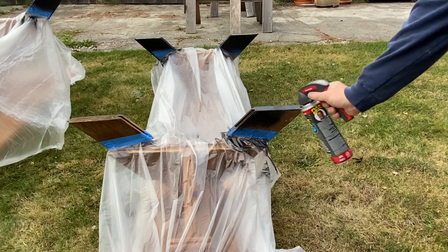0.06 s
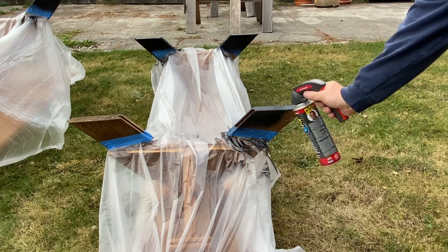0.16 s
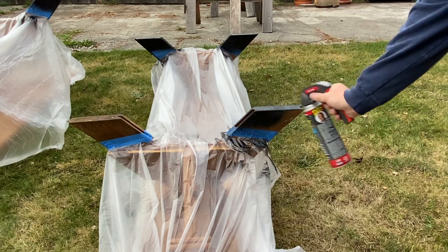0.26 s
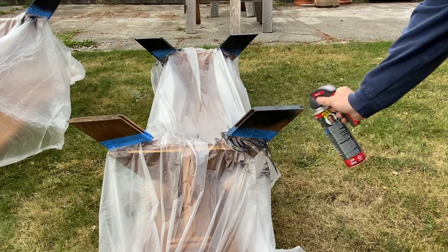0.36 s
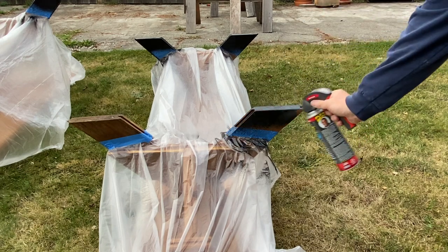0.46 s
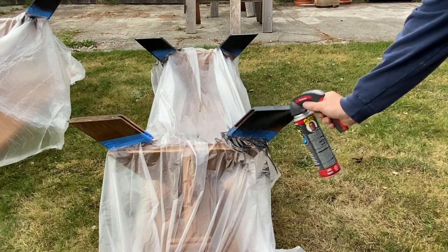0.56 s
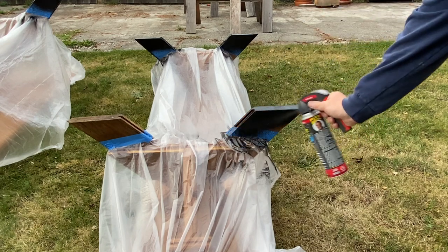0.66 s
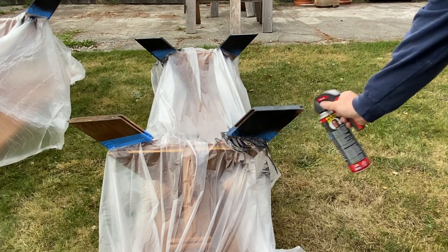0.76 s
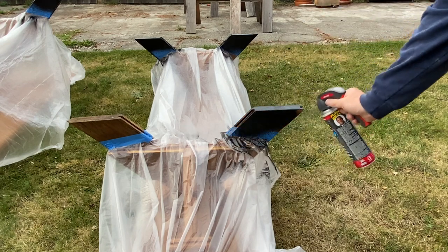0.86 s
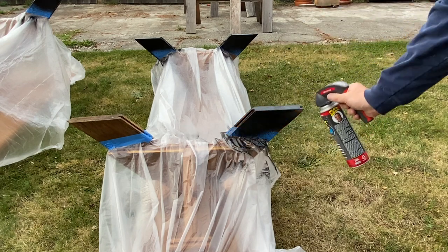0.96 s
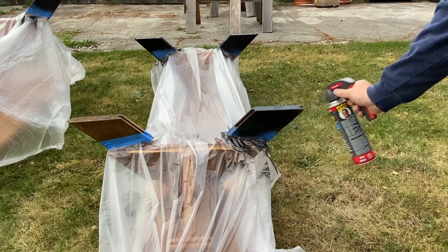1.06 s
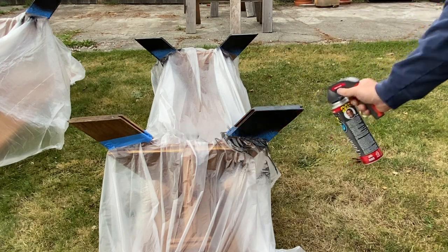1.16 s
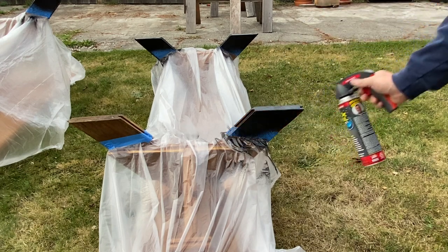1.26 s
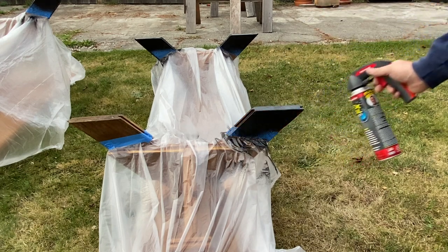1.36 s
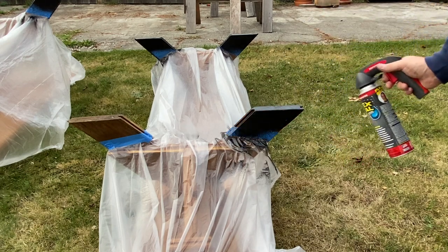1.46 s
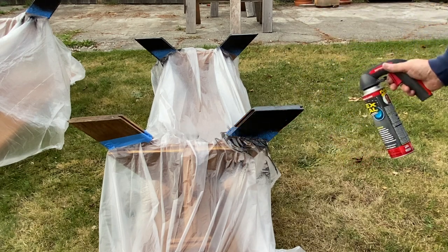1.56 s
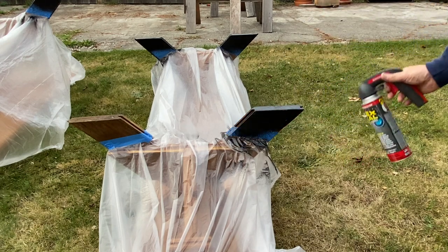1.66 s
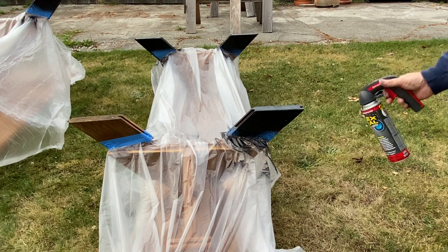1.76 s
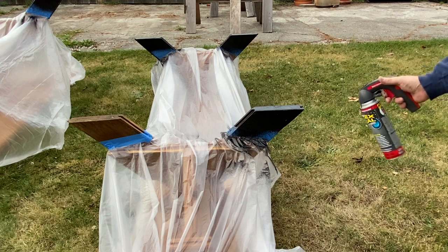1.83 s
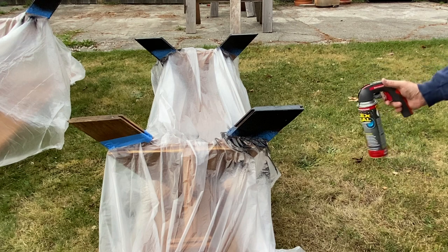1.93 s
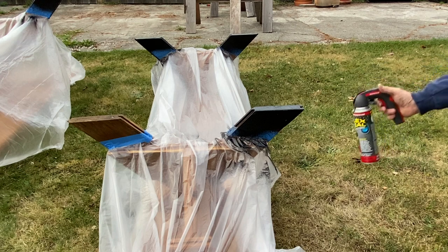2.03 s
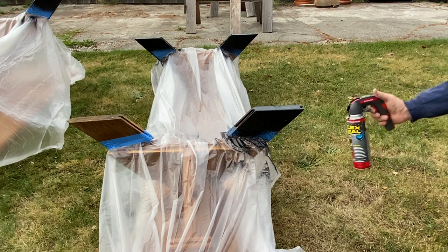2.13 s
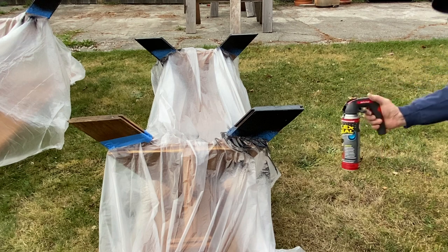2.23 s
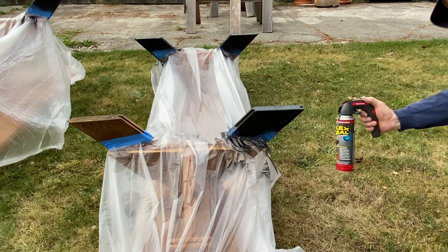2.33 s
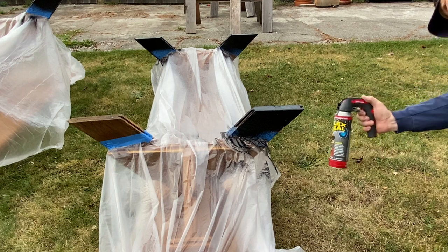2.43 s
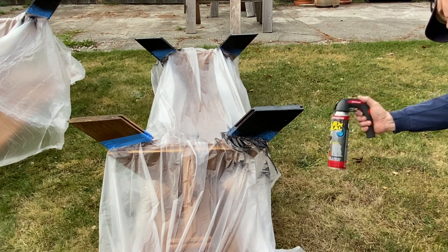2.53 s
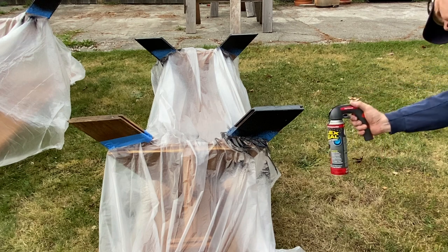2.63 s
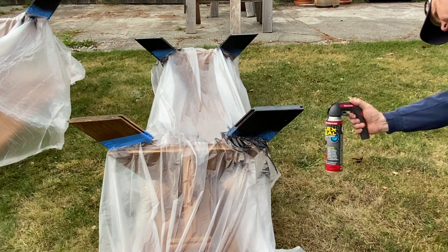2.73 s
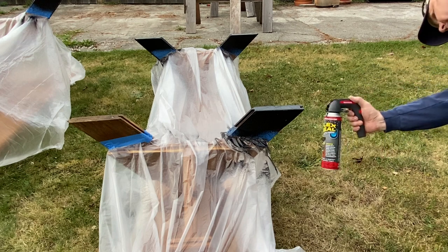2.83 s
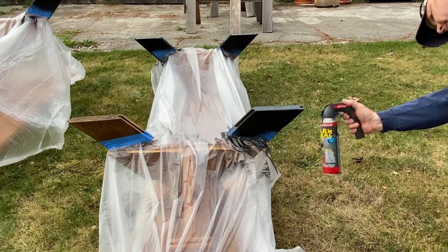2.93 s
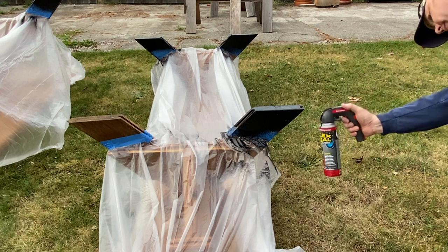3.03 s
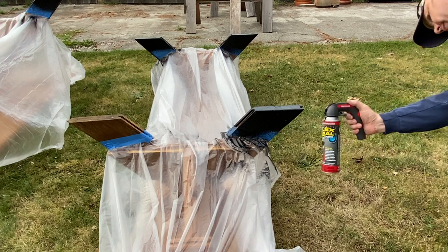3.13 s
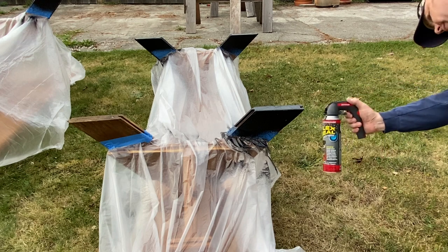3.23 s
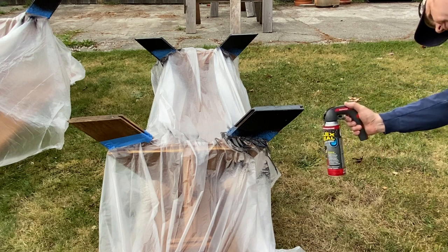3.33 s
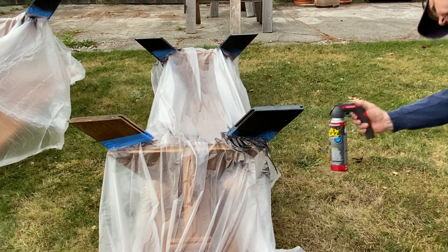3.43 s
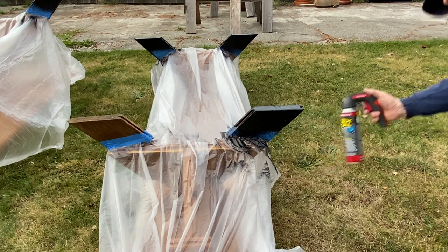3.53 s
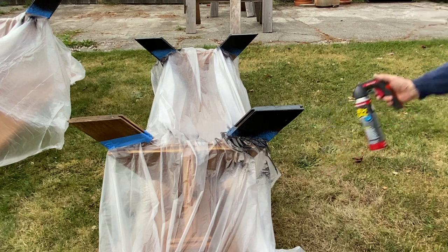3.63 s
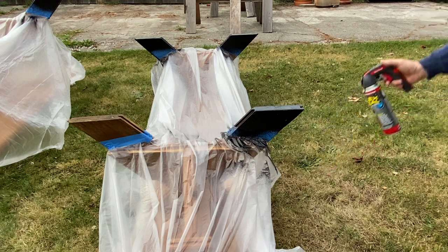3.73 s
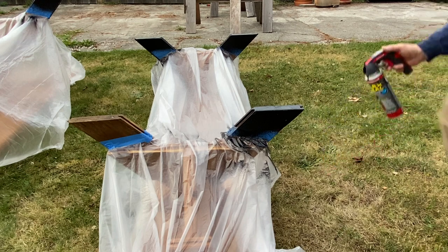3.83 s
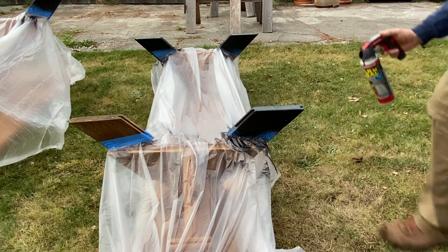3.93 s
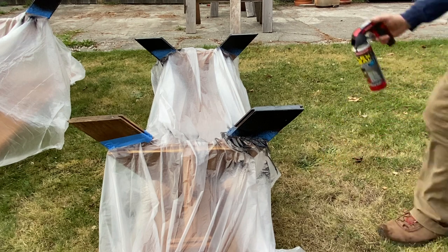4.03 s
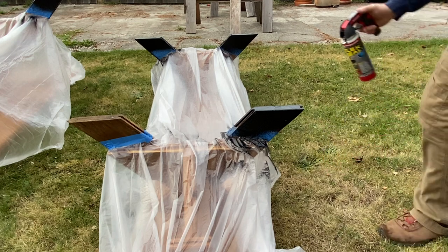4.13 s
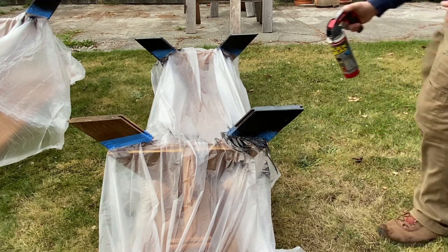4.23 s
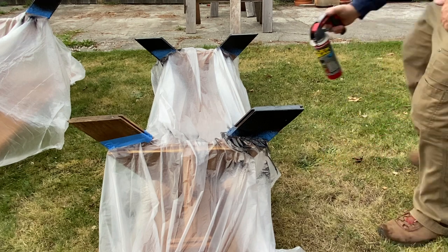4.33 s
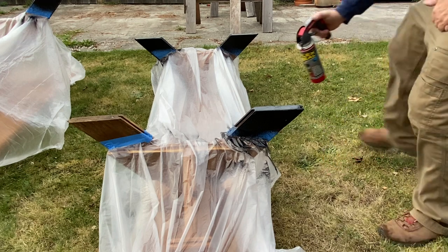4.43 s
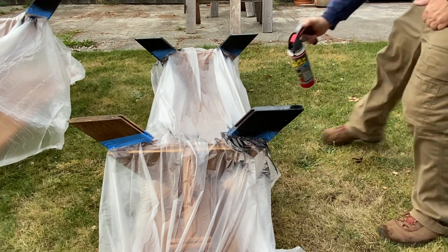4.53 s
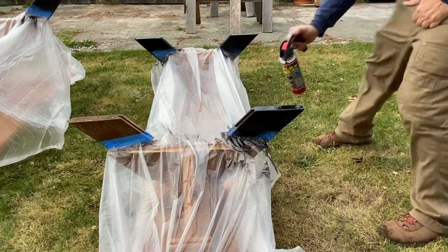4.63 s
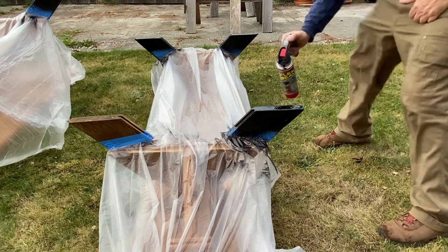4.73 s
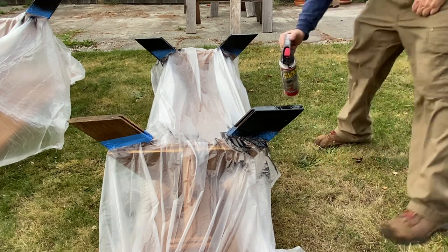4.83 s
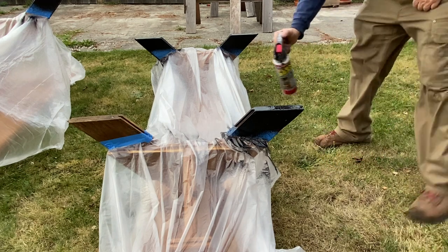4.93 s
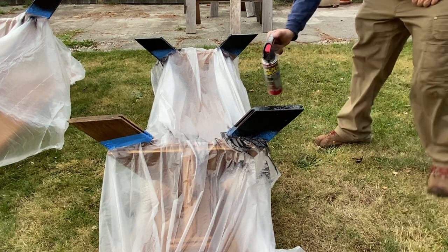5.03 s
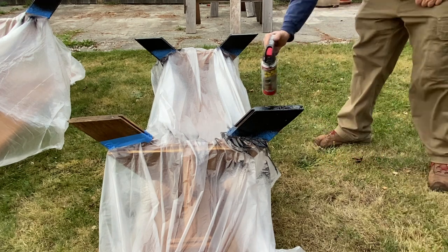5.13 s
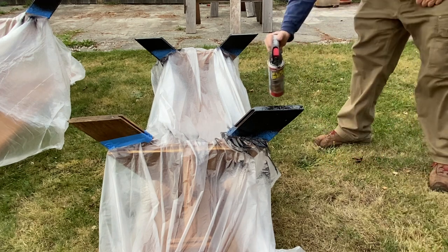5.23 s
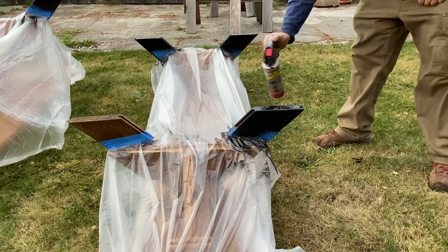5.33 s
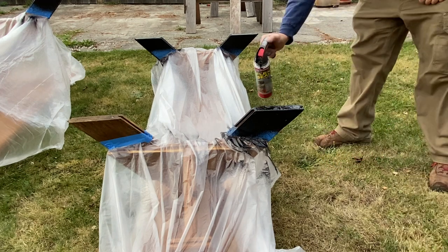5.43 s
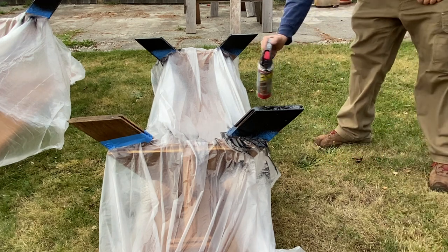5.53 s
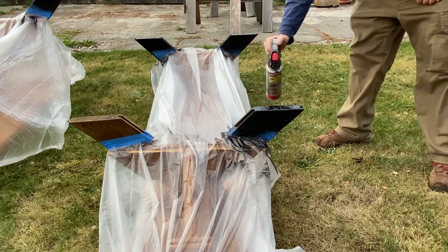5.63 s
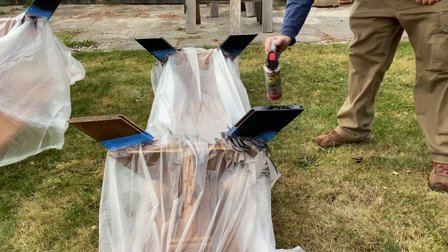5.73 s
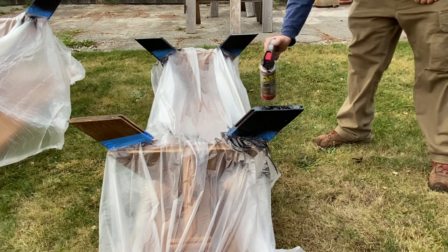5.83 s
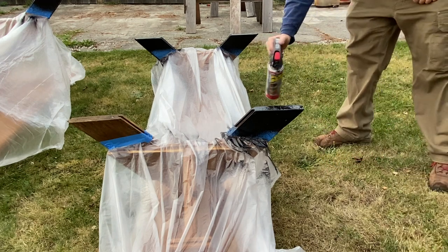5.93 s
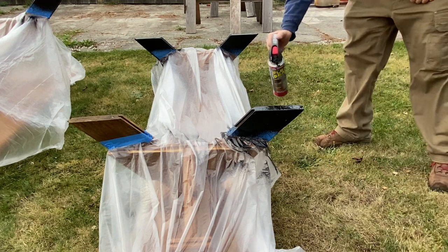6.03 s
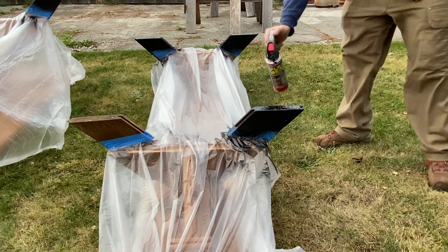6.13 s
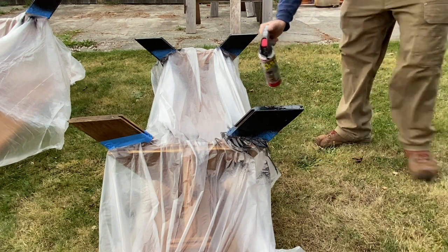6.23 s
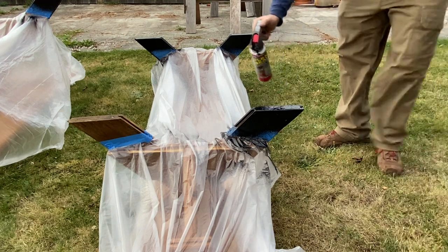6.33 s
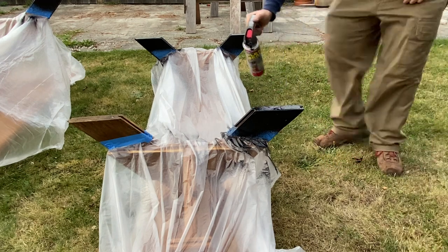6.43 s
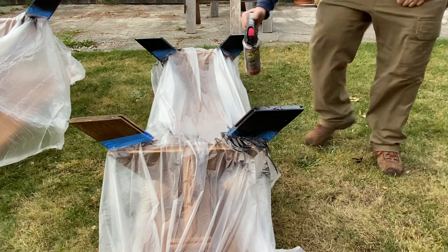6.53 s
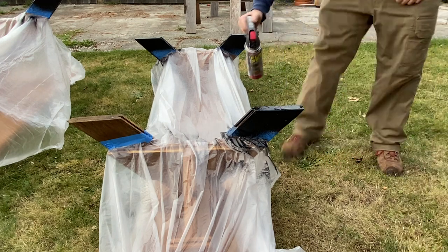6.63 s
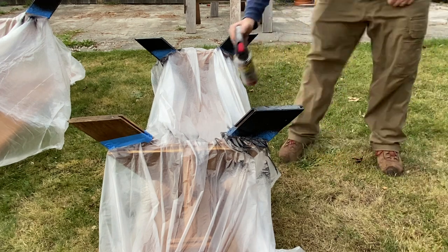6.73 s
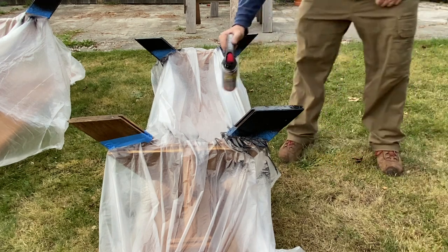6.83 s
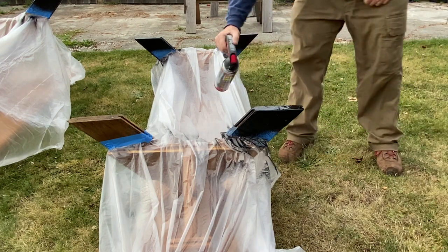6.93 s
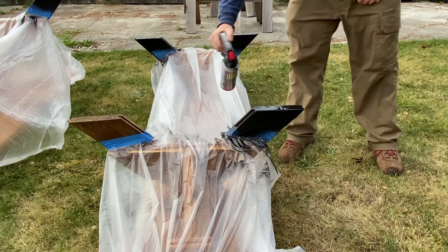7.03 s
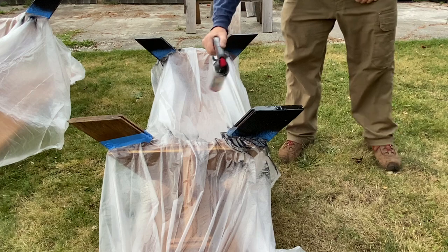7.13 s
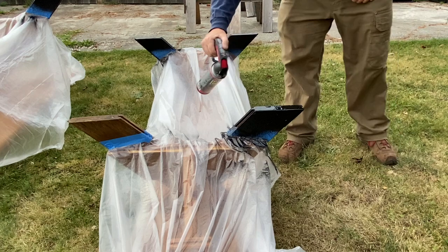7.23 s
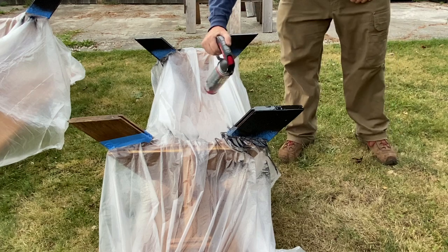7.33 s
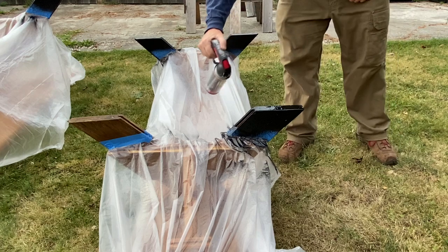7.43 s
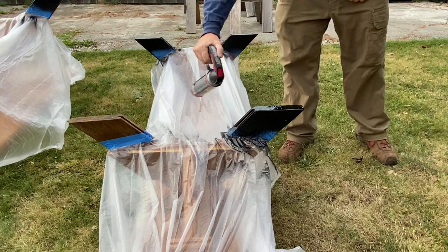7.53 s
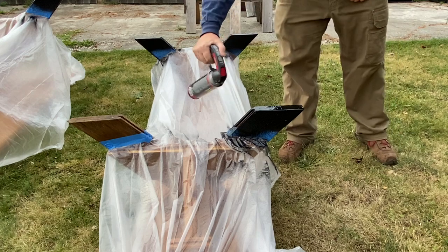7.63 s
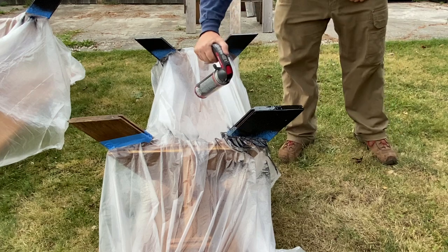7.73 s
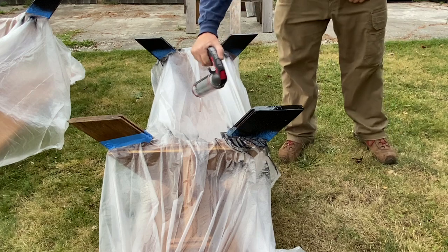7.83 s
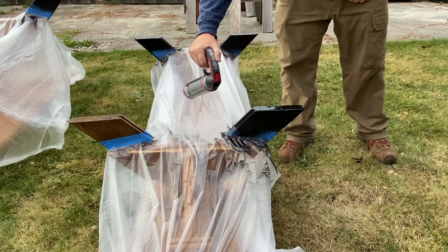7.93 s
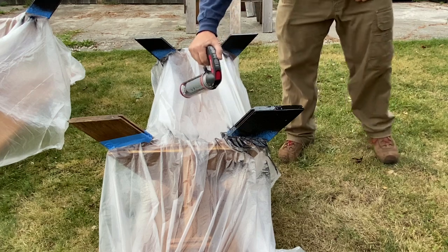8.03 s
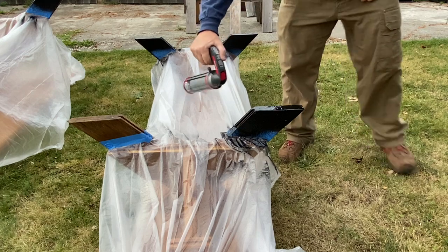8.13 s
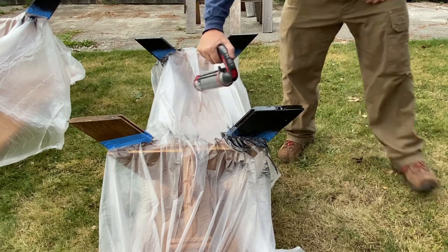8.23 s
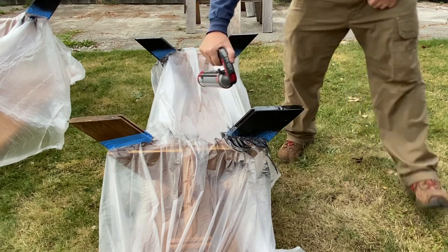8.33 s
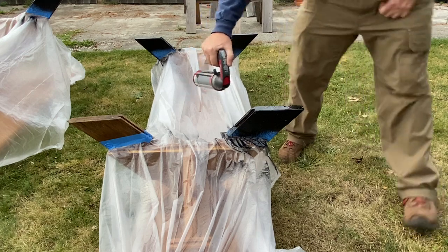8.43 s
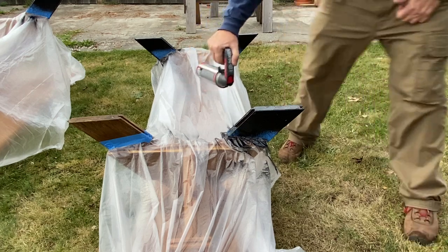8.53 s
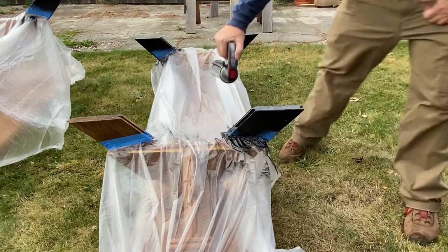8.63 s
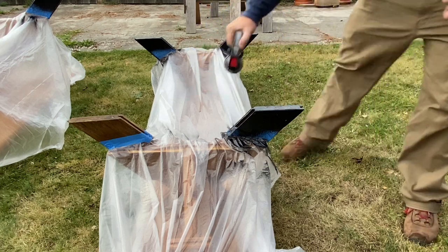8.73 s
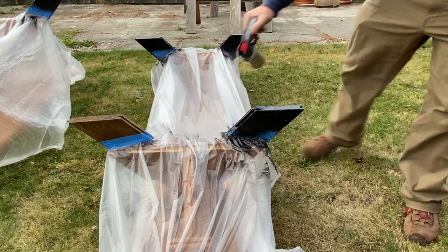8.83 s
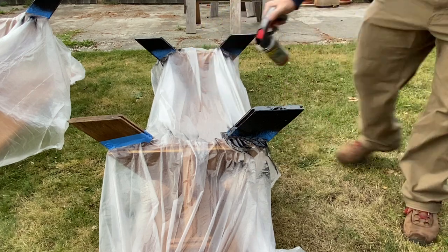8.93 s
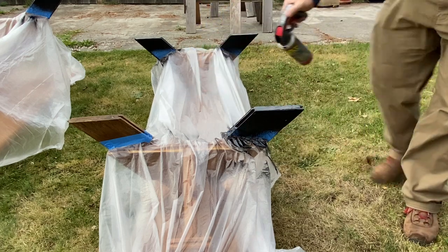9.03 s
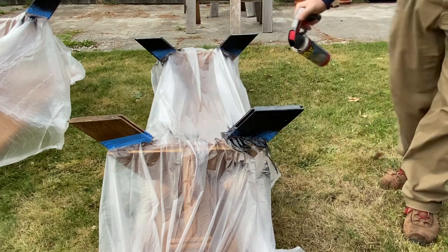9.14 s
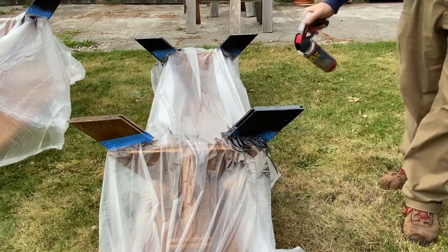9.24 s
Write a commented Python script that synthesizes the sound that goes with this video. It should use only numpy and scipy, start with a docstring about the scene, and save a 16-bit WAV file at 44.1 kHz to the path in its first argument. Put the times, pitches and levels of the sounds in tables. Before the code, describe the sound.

An aerosol can sprays close by on a lawn, over a faint, low wash of distant engines and tyres. The first hiss is under way from the start, slightly to the right, and cuts off at 1.2 seconds. A second runs from 2.3 to 3.5 seconds. Soft footsteps on turf, rustling clothes and grass and a few dry ticks fill the pauses, most noticeably around 4 seconds. Brighter bursts follow from the front, from 4.6 to 6.1 and 6.5 to 7.9 seconds, then a short one from 8.2 to 8.7. Each has a steady, slightly hollow tone whose treble shifts as the can turns, and ends sharply with a tiny wheeze and a faint, short echo. A far engine swells briefly near 6 seconds. Light rustling and a cluster of small ticks close things at about 9 seconds.

```python
"""A lawn, with a phone's stereo microphones near an aerosol can and traffic in the distance.
The trigger grip lets off five bursts, moving from the right to the front. The jet hisses through the
hollow cap, whose resonances hold their pitch while the treble changes as the can turns. Boards and a
fence throw back a faint echo, and the valve wheezes after each release. In the gaps: engines and tyres,
boots and clothes rustling over grass, soft footfalls and a few dry ticks."""
import sys
import numpy as np
from scipy import signal
from scipy.fft import rfft, irfft, next_fast_len
from scipy.io import wavfile
from scipy.ndimage import uniform_filter1d

SR = 44100
rng = np.random.default_rng(int(sys.argv[2]) if len(sys.argv) > 2 else 0)


def log_audio(samples):
    """Write samples as a 16-bit WAV file to the path given in sys.argv[1]."""
    # one column per channel
    frames = np.atleast_2d(samples).T
    # limit to full scale, then quantise
    limited = np.clip(frames, -1, 1)
    pcm = np.round(limited * 32767).astype(np.int16)
    wavfile.write(sys.argv[1], SR, pcm)


N = 408807

# Squeezes of the trigger. Each row: opening, rise, shutting and fall in seconds, then start and end
# pairs of cap level in dB, jet level in dB, left-channel lag in microseconds, board echo delay in ms
# and pose of the can from 0 to 4.
BURSTS = [(-.2, .03, 1.209, 0.023, -35.2, -37, -34.5, -35, 37, 79, 1.6, 1.3, -0.5, -0.5),
          (2.332, 0.046, 3.483, 0.017, -36.5, -35.5, -34, -34, 111, 87, 1.3, 1.54, 1, 1),
          (4.626, 0.05, 6.063, 0.015, -37, -36.5, -30.5, -29.3, 28, -11, 1.6, 1.76, 1.5, 2),
          (6.533, 0.032, 7.883, 0.022, -36, -36.5, -28.5, -31.5, 3, -42, 1.8, 2.05, 3, 3.5),
          (8.213, 0.032, 8.7, 0.019, -35, -36, -30, -30.5, -21, -25, 1.69, 1.94, 4, 4)]
PORT_HZ = 6690  # above this the phone's left channel lags


def amp(db):
    """Decibels to gain."""
    return 10 ** (np.asarray(db) / 20)


def unit_rms(x):
    """Scales to rms 1."""
    return x / np.sqrt(np.mean(x ** 2) + 1e-20)


def over_frequency(points, hz):
    """Interpolates (Hz, value) points on a log-frequency axis."""
    point_hz, value = np.transpose(points)
    return np.interp(np.log(hz + 1), np.log(point_hz + 1), value)


def over_time(rows, t):
    """Interpolates each column after the first, which holds seconds, at the times t."""
    seconds, *columns = np.transpose(rows)
    return [np.interp(t, seconds, column) for column in columns]


def grid(size):
    """Frequencies (column) and frame times (row) of a short-time spectrum."""
    return np.fft.rfftfreq(size, 1 / SR)[:, None], np.arange(4 * N // size + 5) * size / 4 / SR


def hump(hz, centre_hz, width_hz):
    """Power response of a resonance passed twice, peaking at 1."""
    return (1 + (2 * (hz - centre_hz) / width_hz) ** 2) ** -2


def stereo_noise(power, likeness, phase=0., patchy_db=1., flicker_db=1.):
    """Noise of given bin powers and left-right likeness, with drifting patches and an overall flicker."""
    bins, frames = power.shape
    size = 2 * (bins - 1)
    a, b, c, d, patches = rng.standard_normal((frames, bins, 5)).T
    patches = unit_rms(uniform_filter1d(uniform_filter1d(patches, size=6, axis=0), size=14, axis=1))
    flicker = unit_rms(uniform_filter1d(rng.standard_normal(frames), size=3))
    likeness = np.clip(likeness, -1, 1)
    right, unrelated = a + 1j * b, c + 1j * d
    left = likeness * right * np.exp(-1j * phase) + np.sqrt(1 - likeness ** 2) * unrelated
    spectra = np.array([left, right]) * np.sqrt(power) * amp(patchy_db * patches + flicker_db * flicker)
    return np.sqrt(3 / 2) * signal.istft(spectra, nperseg=size, noverlap=3 * size // 4)[1][:, :N]


def resonate(x, hz, width_hz, passes=1):
    """A resonance: each pass shifts hz down to zero, smooths, and shifts back."""
    carrier = np.exp(2j * np.pi * np.cumsum(np.full(len(x), hz)) / SR)
    pole = np.exp(-np.pi * width_hz / SR)
    for _ in range(passes):
        x = 2 * (carrier * signal.lfilter([1 - pole], [1, -pole], x / carrier)).real
    return x


def add(mix, start, sound):
    """Mixes a short sound in at start seconds."""
    part = mix[round(start * SR):][:len(sound)]
    part += sound[:len(part)]


def through_bursts(t):
    """Every paired column of the bursts, gliding from its start to its end value."""
    opens, _, shuts, _, *pairs = np.transpose(BURSTS)
    edges = np.ravel([opens, shuts], "F")
    return [np.interp(t, edges, np.ravel(pair, "F")) for pair in zip(pairs[::2], pairs[1::2])]


def valve():
    """Flow through the nozzle swells as the trigger is squeezed and snaps off on release."""
    t, flow = np.arange(N) / SR, np.zeros(N)
    for opens, rise, shuts, fall, *_ in BURSTS:
        swell = 1 - np.exp(-(np.maximum(t - opens, 0) / rise) ** 2)
        flow += swell * np.exp(-(np.maximum(t - shuts + fall, 0) / fall) ** 2)
    return flow


def radiated(modes, hz, pose, total_db):
    """Power that resonances send towards the phone; their balance shifts as the can turns."""
    power = 0
    for centre_hz, width_hz, *pose_db in modes:
        gain = amp(np.interp(pose, range(len(pose_db)), pose_db))
        power = power + gain ** 2 * hump(hz, centre_hz, width_hz)
    return power / power.sum(0) * amp(total_db) ** 2


def spray(echo_share=.16):
    """Turbulent gas rings the cap and hisses out in lobes, near the phone."""
    # Resonances of cap and can. Each row: centre in Hz, width in Hz, relative dB in each of five poses.
    cap_modes = [(588, 105, -16, -12, -14.5, -17.5, -18.5), (955, 420, -18.5, -20.5, -18, -14.5, -20),
                 (1309, 180, -6, -5, -12.5, -9.5, -8.5), (1713, 245, -7, -6.5, -5, -4.5, -8.5),
                 (2042, 346, 2, 1.5, 0.5, 2.5, 0), (2536, 234, -2.5, -5.5, -2, 0, -1.5),
                 (3005, 190, -6, -9.5, -9, -6.5, -9), (3216, 450, -17, -21, -22, -19, -12.5)]
    # Whistles and lobes of the jet, with the same columns.
    jet_lobes = [(3900, 210, -12, -15, -40, -18.5, -10), (4435, 504, 0.5, -10.5, -11.5, -13.5, -7.5),
                 (5426, 900, -3.5, -1.5, -8, -10.5, -12), (6370, 1100, -18, -26, -11.5, -12, -12.5),
                 (7380, 1660, -9, -9.5, -31, -11, -11), (8130, 880, -7, -5.5, -4, -3.5, -6),
                 (9630, 160, -27, -18, -18, 0, -3.5), (10180, 1100, -11, -4, -3.5, -3, -2.5),
                 (11470, 1530, -1.5, -6, 0.5, -0.5, -3), (12670, 570, -10, 0, -5, 1, -2),
                 (13070, 1900, -3.5, -6.5, -3, -1.5, -0.5), (14680, 2000, -9.5, -11.5, -3, -4.5, -15)]
    # Stereo image of the hiss. Each row: frequency in Hz, left-right likeness.
    hiss_likeness = [(700, 0.81), (1400, 1), (3000, 1), (3700, 0.76), (4400, 0.87), (7000, 1)]
    # Left-right likeness of the whistle band, one value for each pose.
    whistle_likeness = [0.52, 1, 0.057, 0.35, 0.64]
    hz, t = grid(1024)
    cap_db, jet_db, lag_us, echo_ms, pose = through_bursts(t)
    power = radiated(cap_modes, hz, pose, cap_db) + radiated(jet_lobes, hz, pose, jet_db)
    # Board and table throw the hiss back: ripples that shift as the hand moves.
    ripples = sum(np.cos(2 * np.pi * hz * echo_ms * path / 1000) for path in (1, .63, 1.71))
    power *= 1 + 2 * echo_share * (hz > 3600) * ripples
    # Low tones tell the direction; higher up the channels turn from in step to opposed and back.
    treble_turns = np.clip((hz - 4400) / (PORT_HZ - 4400), 0, 1)
    phase = 2 * np.pi * np.where(hz < 3750, hz * lag_us * 1e-6, treble_turns)
    # Droplets break the stream.
    sputter = amp(0.5 * unit_rms(uniform_filter1d(rng.standard_normal(N), size=300)))
    whistle = np.interp(pose, range(len(whistle_likeness)), whistle_likeness)
    likeness = np.where((hz > 4900) & (hz < 6300), whistle, over_frequency(hiss_likeness, hz))
    return valve() * sputter * stereo_noise(power, likeness, phase, patchy_db=1.52, flicker_db=0.)


def yard_echo(x, gain_db=-14.5, t60=0.26, dull_above_hz=2400):
    """Boards and fence return a short, dull echo, with the same decay in both channels."""
    t = np.arange(SR // 3) / SR
    tail = rng.standard_normal(len(t)) * amp(-60 * t / t60) * (t > .008)
    tail = signal.lfilter(*signal.butter(1, dull_above_hz, fs=SR), tail / np.linalg.norm(tail))
    return amp(gain_db) * signal.oaconvolve(x, tail[None], axes=1)[:, :N]


def traffic(wash_db=-46):
    """Distant traffic blends into a low wash, with tyre hiss coming and going above it."""
    # Colour of the wash. Each row: frequency in Hz, relative level in dB.
    wash_colour = [(15, -62), (25, -25), (39, -6.5), (101, -0.5), (143, -6), (259, -17.5), (471, -19.5),
                   (528, -19), (711, -19.5), (1230, -24), (1550, -32), (3880, -42), (6000, -47),
                   (7800, -75), (13200, -120)]
    # Stereo image of the wash. Each row: frequency in Hz, left-right likeness.
    wash_likeness = [(40, 0.99), (130, 0.64), (290, 0.42), (640, -0.4), (1400, -0.36), (3100, -0.17)]
    # Far tyre hiss. Each row: time in seconds, level in dB.
    tyre_levels = [(0, -62), (4.0, -75), (4.5, -57.5), (6.3, -60.5), (8.0, -62), (9.0, -53.5)]
    hz, t = grid(2048)
    power = amp(over_frequency(wash_colour, hz)) ** 2 * np.ones(len(t))
    likeness = over_frequency(wash_likeness, hz)
    wash = stereo_noise(power / power.sum(0), likeness, patchy_db=1.5, flicker_db=.2)
    tyre_band = hump(hz, centre_hz=1370, width_hz=990)
    tyre_power = tyre_band / tyre_band.sum() * amp(over_time(tyre_levels, t)[0]) ** 2
    return amp(wash_db) * wash + stereo_noise(tyre_power, likeness=-0.05, flicker_db=-2.)


def engines():
    """Far engines, never running quite evenly: four gliding tones and two steadier hums."""
    # The lowest engine tone, slowing down. Each row: time in seconds, pitch in Hz, level in dB.
    drone = [(0.0, 57.1, -52), (0.95, 61, -45.5), (2.2, 66, -52), (2.9, 60, -48), (4.0, 55.5, -49),
             (4.6, 51.1, -45.5), (5.9, 44.84, -55.5), (6.5, 47, -47.5), (6.9, 48.1, -55)]
    # With the same columns: a vehicle going by, a higher tone sinking away and one wavering.
    passer = [(5.5, 63.4, -56), (5.86, 65.96, -36.5), (6.36, 75, -48.5), (6.83, 74.14, -52.5),
              (7.3, 68, -42.5), (7.75, 62.2, -49), (8.4, 58.5, -46.5), (9.27, 57.5, -52)]
    sinking = [(0, 118.4, -49.5), (2.9, 115.2, -55), (4.6, 110.8, -60)]
    wavering = [(2.6, 147.4, -55), (4.2, 151.9, -52), (5.2, 140.5, -56.5), (6.5, 149, -52.5),
                (7.3, 148.7, -67.5), (8.2, 146.2, -54.5), (9.27, 146.8, -56)]
    # Hums. Each row: pitch in Hz, width in Hz, level in dB at the start, middle and end.
    hums = [(93.9, 4.4, -50.5, -55, -58.5), (188.9, 3.9, -60, -60, -65)]
    t, out = np.arange(N) / SR, np.zeros(N)
    for track in (drone, passer, sinking, wavering):
        hz, db = over_time(track, t)
        gate = uniform_filter1d(1. * (t >= track[0][0]) * (t <= track[-1][0]), size=4000)
        lumpiness = 1 + .4 * unit_rms(resonate(rng.standard_normal(N), hz=2., width_hz=4.))
        out += np.sqrt(2) * amp(db) * gate * lumpiness * np.sin(2 * np.pi * np.cumsum(hz) / SR)
    for hz, width_hz, *db in hums:
        hum = resonate(rng.standard_normal(N), hz, width_hz, passes=2)
        out += amp(np.interp(t, [0, t[-1] / 2, t[-1]], db)) * unit_rms(hum)
    return out


def rustle(lawn_db=-74, edge_db=-12):
    """Legs and arms brush grass and cloth: grainy swishes over the lawn's faint, steady stir."""
    # Colour of grass and cloth. Each row: frequency in Hz, relative level in dB.
    rustle_colour = [(700, 5.5), (2000, -4), (3200, -7.5), (5000, -1.5), (8000, -2), (12000, -3),
                     (16000, -3.5)]
    # Swishes. Each row: loudest moment, swell and fade in seconds, level in dB, tilt in dB an octave.
    swishes = [(1.43, .14, 0.13, -68, 0.5), (1.77, 0.12, .12, -61, -2), (2.101, 0.21, 0.11, -62, -1.5),
               (2.25, .12, 0.076, -62, -1.5), (3.64, 0.08, .06, -67.5, 0), (3.87, 0.17, .12, -58, -2),
               (4.03, 0.11, 0.054, -52, -1), (4.11, .05, .1, -60.5, -1.5), (4.299, 0.095, .07, -62.5, 3),
               (6.26, 0.051, 0.094, -71.5, 5), (6.40, 0.033, .03, -58, 0.5), (6.46, .06, 0.21, -65.5, -2),
               (7.93, 0.045, 0.053, -76, -5), (8.76, 0.067, .1, -64.5, -3.5),
               (8.875, 0.047, 0.036, -55, -1), (8.93, .05, 0.066, -65, -2), (9.04, .045, 0.049, -61, 2),
               (9.085, 0.02, .03, -53, 5.5), (9.15, 0.046, 0.048, -59, 1), (9.23, 0.055, 0.077, -64.5, -2)]
    hz, t = grid(512)

    def colour(tilt_db):
        """The tilted spectrum, with unit power between 3 and 8 kHz."""
        power = amp(over_frequency(rustle_colour, hz) + tilt_db * np.log2((hz + 1) / 5000)) ** 2
        return power * (hz > 500) / power[(hz > 3000) & (hz < 8000)].sum()

    power = colour(tilt_db=-2) * amp(lawn_db) ** 2 * np.ones(len(t))
    for loudest, swell, fade, db, tilt_db in swishes:
        from_top = (t - loudest) / np.where(t < loudest, swell, fade)
        power += colour(tilt_db) * amp(db + edge_db * from_top ** 2) ** 2
    likeness = over_frequency([(3000, 0.075), (6000, 0.033), (7000, 1.0)], hz)
    return stereo_noise(power, likeness, patchy_db=2., flicker_db=1.5)


def footfalls():
    """Boots set down on turf, each a dull puff of noise."""
    # Each row: start in seconds, level in dB, upper band edge in Hz, rise and 60 dB decay in seconds.
    steps = [(.01, -45, 500, .004, .15), (1.815, -45, 900, .002, .07), (3.707, -45, 500, .003, .2),
             (3.718, -44, 1000, .002, .07), (3.97, -49, 600, .03, .3), (4.325, -44, 1800, .002, .06),
             (4.96, -41, 700, .06, .6)]
    out, t = np.zeros(N), np.arange(SR // 4) / SR
    for start, db, top_hz, rise, t60 in steps:
        band = signal.butter(2, [180, top_hz], "band", fs=SR, output="sos")
        puff = unit_rms(signal.sosfilt(band, rng.standard_normal(len(t))))
        add(out, start, amp(db - 60 * t / t60) * np.minimum(t / rise, 1) * puff)
    return out


def valve_leak(level_db=-53.5, t60=0.31):
    """The valve wheezes on after it shuts, thin and dying away."""
    out, t = np.zeros(N), np.arange(SR // 4) / SR
    for _, _, shuts, *_ in BURSTS:
        wheeze = resonate(rng.standard_normal(len(t)), hz=7000, width_hz=8100, passes=2)
        add(out, shuts, amp(level_db - 60 * t / t60) * unit_rms(wheeze))
    return out


def ticks(t60=.006):
    """Small dry ticks, each a few milliseconds of coloured noise."""
    # Each row: start in seconds, peak level in dB, centre in Hz, width in Hz.
    snaps = [(1.581, -41, 5000, 9000), (1.74, -52, 6000, 3000), (4.045, -50, 3000, 2500),
             (4.062, -41, 2600, 2500), (4.171, -31, 10500, 7000), (4.24, -53, 2300, 900),
             (4.527, -37, 9000, 10000), (6.358, -52, 7000, 4000), (6.368, -48, 7500, 3000),
             (6.393, -43, 12000, 5000), (8.766, -52, 8000, 4000), (9.01, -44, 9000, 12000),
             (9.07, -46, 10000, 2000), (9.078, -44, 10000, 2000), (9.087, -40, 9500, 3500),
             (9.1, -34, 8000, 10000), (9.15, -46, 11000, 4000), (9.185, -48, 9000, 5000)]
    out, t = np.zeros(N), np.arange(600) / SR
    for start, db, hz, width_hz in snaps:
        impulse = rng.standard_normal(len(t)) * amp(-60 * t / t60)
        snap = resonate(impulse, hz, width_hz, passes=2)
        add(out, start, amp(db) * snap / abs(snap).max())
    return out


def scene():
    """The lawn as it sounds from where the phone is."""
    hiss = spray()
    can = hiss + valve_leak() + yard_echo(hiss)
    return can + traffic() + engines() + rustle() + ticks() + footfalls()


def record(dry, port_cycle_hz=4410, cutoff_hz=15850):
    """The phone's microphones: treble reaches the left late from any direction, then a band limit."""
    size = next_fast_len(N + 1000)
    hz = np.fft.rfftfreq(size, 1 / SR)
    treble_delay = np.exp(-2j * np.pi * np.maximum(hz - PORT_HZ, 0) / port_cycle_hz)
    left = irfft(rfft(dry[0], size) * treble_delay, size)[:N]
    lowpass = signal.firwin(511, cutoff_hz, window=("kaiser", 9), fs=SR)
    return signal.oaconvolve(np.array([left, dry[1]]), lowpass[None], "same")


dry = scene()
out = record(dry)
log_audio(out)
```